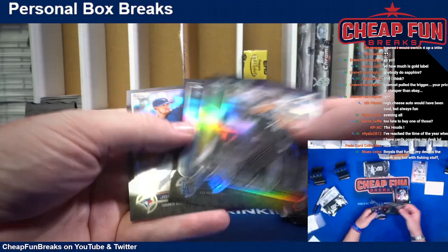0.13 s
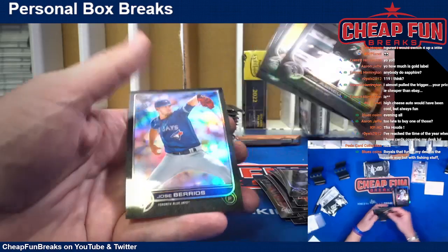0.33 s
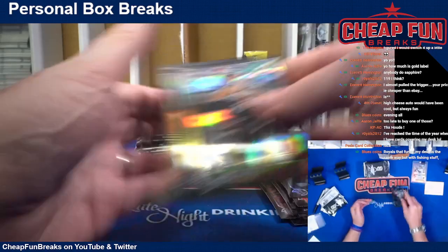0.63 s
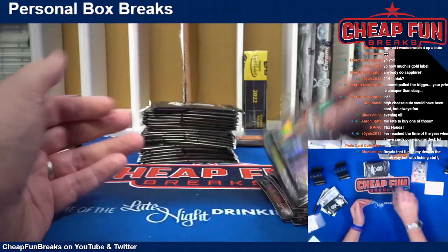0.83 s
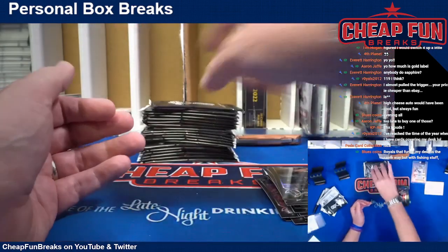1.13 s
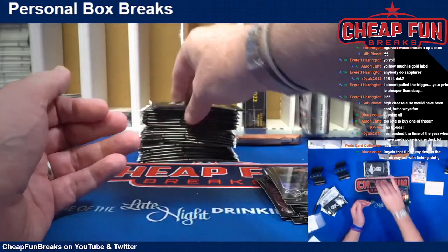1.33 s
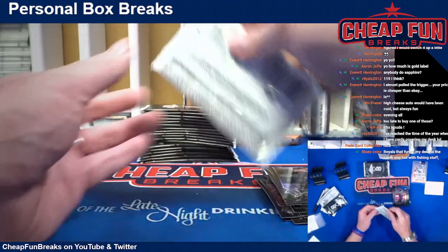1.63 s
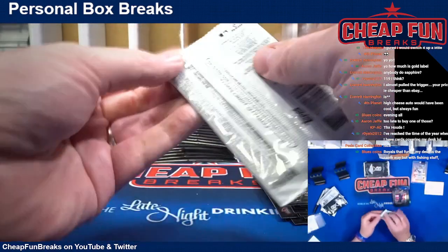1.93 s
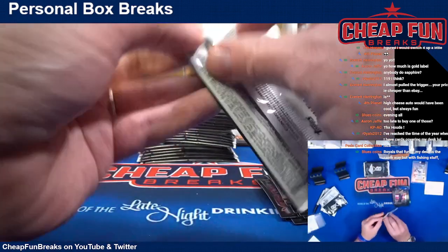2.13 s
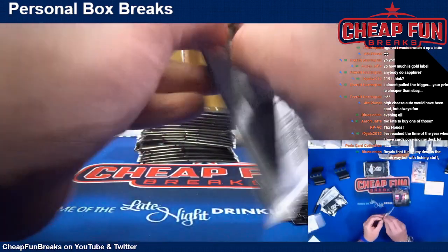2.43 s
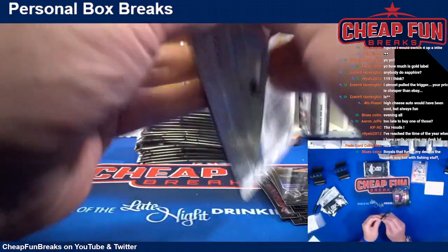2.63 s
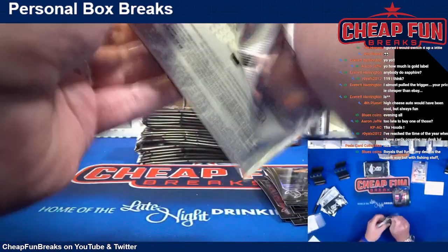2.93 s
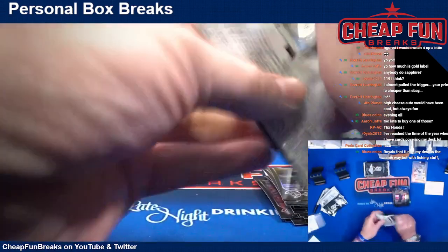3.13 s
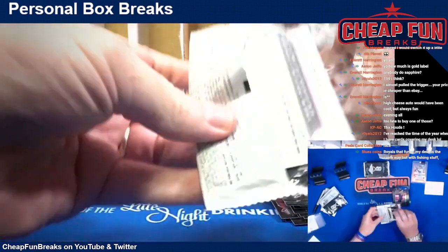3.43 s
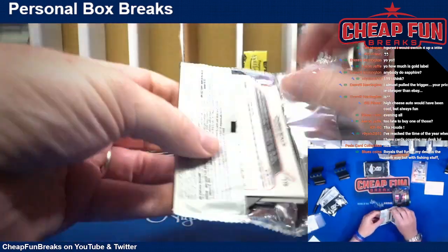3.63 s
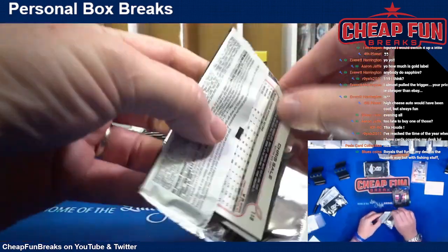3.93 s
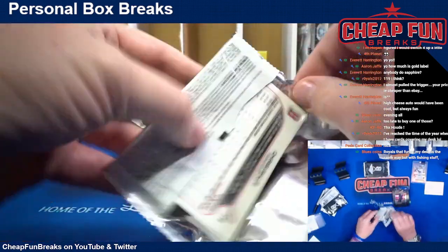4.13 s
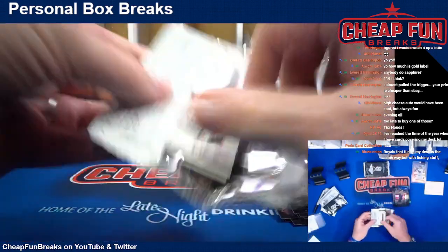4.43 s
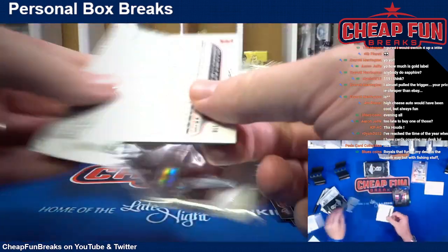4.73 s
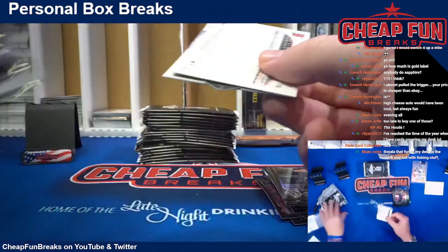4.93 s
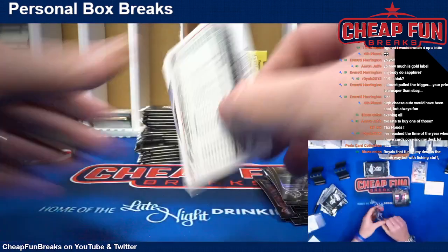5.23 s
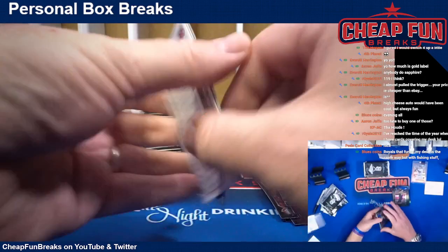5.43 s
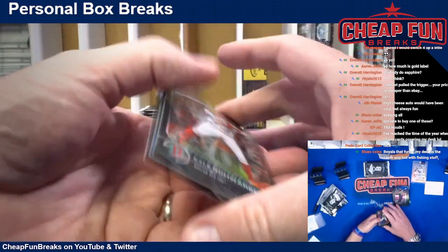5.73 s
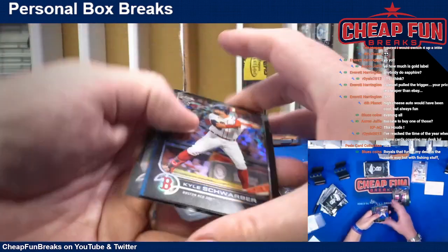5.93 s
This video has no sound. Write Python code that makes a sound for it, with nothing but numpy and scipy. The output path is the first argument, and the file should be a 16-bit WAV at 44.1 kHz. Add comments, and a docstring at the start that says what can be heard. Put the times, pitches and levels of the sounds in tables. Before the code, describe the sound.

Hands tear open a foil card pack with sharp snaps and crinkles, between faint card swishes over a low hum.

```python
"""In a quiet room, near a desk microphone, hands tear open a foil pack of cards and slide the cards out.
Sliding friction makes the cards swish. Creases in the foil buckle, singly as snaps and in crowds as
crinkling, and excite the resonances of the hollow pack. Arms bump the desk, which thuds in its damped
modes and sways the microphone. Rumble, hiss and the hum of appliances lie under it all."""
import sys
import numpy as np
from scipy import signal
from scipy.fft import rfft, irfft
from scipy.io import wavfile
from scipy.ndimage import uniform_filter1d

SR = 44100
rng = np.random.default_rng(int(sys.argv[2]) if len(sys.argv) > 2 else 0)


def int16_out(signal):
    """Quantize to a 16-bit WAV file."""
    q = np.round(np.clip(np.atleast_2d(signal).T, -1, 1) * 32767)
    wavfile.write(sys.argv[1], SR, q.astype(np.int16))


N = 268701


def gain_of(db):
    """Amplitude ratio of a level in decibels."""
    return 10 ** (np.asarray(db) / 20)


def unit_rms(x):
    """Normalisation to an rms of 1."""
    return x / np.sqrt(np.mean(x ** 2) + 1e-20)


def coloured(x, points):
    """Spectral shaping: gains in dB are interpolated on a log-frequency axis."""
    point_hz, db = np.transpose(points)
    hz = np.fft.rfftfreq(len(x), 1 / SR)
    return irfft(rfft(x) * gain_of(np.interp(np.log(hz + 1), np.log(point_hz + 1), db)), len(x))


def add(mix, start_s, sound):
    """Superposition: a sound joins the mix at its start time."""
    part = mix[round(start_s * SR):][:len(sound)]
    part += sound[:len(part)]


def resonate(x, hz, width_hz, stages=1):
    """Forced response of a damped resonator, or of several alike in cascade."""
    carrier = np.exp(2j * np.pi * hz * np.arange(len(x)) / SR)
    pole = np.exp(-np.pi * width_hz / SR)
    for _ in range(stages):
        x = 2 * (carrier * signal.lfilter([1 - pole], [1, -pole], x / carrier)).real
    return x


def room_tone():
    """Background noise: rumble and hiss, with appliance tones that waver by beating with noise bands."""
    # spectrum of the rumble and hiss: (frequency [Hz], relative spectral level [dB])
    air_spectrum = [(10, -8), (25, -11.5), (45, 2), (70, -4), (100, -7.5), (170, -14.5), (300, -22),
                    (600, -27), (1600, -32.5), (2800, -38), (8000, -40), (15000, -41)]
    # appliance tones: (frequency [Hz], base width that the noise band scales up [Hz], level [dB])
    hum_tones = [(118.9, 6.2, -66.5), (249.1, 10, -77.5), (330.9, 7.8, -81.5), (349, 16, -86.5),
                 (491, 15, -87.5), (1603, 180, -96.5)]
    t = np.arange(N) / SR
    out = gain_of(-65.5) * unit_rms(coloured(rng.standard_normal(N), air_spectrum))
    for hz, base_width, db in hum_tones:
        waver = unit_rms(resonate(rng.standard_normal(N), hz, 4.3 * base_width, stages=2))
        tone = np.sin(2 * np.pi * (hz * t + rng.random()))
        out += gain_of(db) * (1.3 * tone + .4 * waver)
    return out


def microphone_sway(rocking_hz=15.6):
    """Infrasonic oscillation: the microphone rocks unsteadily on its stand."""
    # strength of the rocking: (time [s], level [dB])
    rocking_levels = [(0.0, -65.5), (0.27, -48), (0.36, -56), (0.61, -47), (0.85, -55.5), (2.14, -56.5),
                      (2.75, -46), (2.9, -63), (3.09, -46), (3.54, -54.5), (4.14, -49.5), (4.27, -36),
                      (4.41, -46.5), (5.17, -66), (5.36, -46.5), (5.75, -61.5), (6.02, -48.5), (6.09, -51)]
    t = np.arange(N) / SR
    envelope = gain_of(np.interp(t, *np.transpose(rocking_levels)))
    wobble = unit_rms(resonate(rng.standard_normal(N), 1.1 * rocking_hz, width_hz=2.43))
    return envelope * (1.4 * np.sin(2 * np.pi * rocking_hz * t) + 0.2 * wobble)


def card_slides():
    """Friction noise: glossy cards rub on cards and skin with a soft, slightly grainy swish."""
    # sliding strokes: (time [s], duration [s], level [dB], centre frequency [Hz])
    strokes = [(0.194, 0.14, -77, 5070), (0.459, 0.09, -79.5, 3500), (0.605, 0.034, -81, 6900),
               (0.655, 0.044, -68.5, 4320), (1.077, 0.092, -81, 7500), (1.202, 0.06, -68.5, 5000),
               (1.494, 0.034, -74, 4970), (1.645, 0.082, -76.5, 6070), (4.403, .12, -69.5, 6040),
               (5.129, 0.13, -78.5, 4280), (5.443, 0.057, -73, 4040), (5.68, 0.055, -83, 4000)]
    out = np.zeros(N)
    for start, duration, db, hz in strokes:
        rub, grain = rng.standard_normal((2, round(duration * SR)))
        roughness = gain_of(3 * unit_rms(uniform_filter1d(grain, 150)))
        swish = unit_rms(resonate(rub * roughness, hz, 2.8 * hz, stages=2))
        add(out, start, gain_of(db) * swish * signal.windows.tukey(len(swish), .7))
    return out


def pack_body(x):
    """Modal resonance: the hollow pack rings in its broad low modes."""
    # modes of the pack: (frequency [Hz], bandwidth of each stage [Hz], gain [dB])
    modes = [(408, 435, -4), (687, 340, 2), (1166, 150, 8.5), (1697, 1390, -3)]
    return sum(gain_of(db) * resonate(x, hz, width, stages=2) for hz, width, db in modes)


def foil_snaps(typical_t60_s=0.017, t60_spread=0.15):
    """Buckling: a crease gives way in a burst that rings at the crease pitch and knocks in the pack."""
    # snaps of foil and card edges: (time [s], peak level [dB], pitch [Hz], body level [dB re peak])
    snaps = [(0.228, -54, 3970, -1), (0.6213, -57, 7100, -25), (0.6618, -63, 3050, 3),
             (0.6766, -59, 4040, 6), (1.2023, -56, 3000, -11), (1.2252, -53, 4570, -20),
             (1.238, -57, 4000, -20), (1.514, -50, 6900, -24), (1.6445, -43, 7200, -19),
             (1.7345, -37, 6660, -37), (1.802, -46, 7400, -38), (1.8727, -53, 2820, -9),
             (1.986, -49.5, 4550, -13), (2.009, -44, 3520, -32), (2.055, -41, 6000, -42),
             (2.1093, -47, 4060, -5.5), (2.16, -30, 6500, -42), (2.1832, -33, 5050, -36),
             (2.1967, -31.5, 4670, -40), (2.228, -27, 4350, -44), (2.2635, -39, 3550, -48),
             (2.343, -41, 6150, -16), (2.3537, -39, 4260, -19), (2.3979, -47, 5530, -9),
             (2.4304, -45.5, 6500, -22), (2.516, -45.5, 4760, -25), (2.544, -21, 10000, -45),
             (2.5673, -34, 4520, -22), (2.591, -27.5, 6300, -32), (2.626, -38.5, 3740, -33),
             (2.639, -32, 3030, -44), (2.6646, -34.5, 6700, -13), (2.6862, -36.5, 6700, -12),
             (2.7421, -43, 4040, -4), (2.7609, -48.5, 4270, 6), (2.7813, -41.5, 5060, -1),
             (2.811, -45, 6700, -28), (2.8542, -34.5, 7780, -46), (2.8805, -25, 6700, -34),
             (2.9058, -29.5, 6840, -15.5), (2.9258, -33.5, 4250, -20), (2.9687, -40.5, 5960, -18),
             (2.985, -27, 5930, -19), (3.0383, -17, 6500, -38), (3.0675, -28, 7000, -10),
             (3.099, -19.5, 10900, -21), (3.118, -26, 8000, -28), (3.128, -26, 10900, -37),
             (3.1688, -43, 5000, -37), (3.2383, -35, 8200, -16.5), (3.274, -37, 6900, -23),
             (3.325, -40, 5140, -13), (3.35, -44.5, 6100, -20), (3.39, -27.5, 11100, -54),
             (3.4198, -36, 10800, -37), (3.5143, -46.5, 4400, -9.5), (3.7797, -42, 5700, -44),
             (3.7926, -43, 5770, -33), (3.803, -37, 7350, -20.5), (3.8545, -38, 4360, -9.5),
             (3.8791, -23, 7260, -55), (3.898, -26.5, 11900, -7), (3.9334, -40.5, 9750, -34),
             (3.961, -46.5, 5890, -25), (4.0121, -40, 6600, -7), (4.064, -49.5, 3320, -6),
             (4.219, -48, 4630, -12), (4.3047, -39.5, 7840, -28), (4.3485, -44, 3600, -13),
             (4.3794, -55, 3400, 3), (4.52, -47.5, 4400, -4), (4.591, -56.5, 2370, -2),
             (4.63, -37, 5370, -16), (4.667, -46, 2280, -4), (4.732, -39, 3540, -9),
             (4.809, -52, 2250, -28), (4.885, -45, 2730, -0.5), (4.93, -43, 1560, 1)]
    out, t = np.zeros(N), np.arange(1800) / SR
    for start, peak_db, hz, body_db in snaps:
        t60 = np.clip(typical_t60_s * np.exp(t60_spread * rng.standard_normal()), .004, .05)
        crack = 2.5 * gain_of(-60 * t / .0025)
        burst = rng.standard_normal(len(t)) * (crack + gain_of(-60 * t / t60))
        ring = resonate(burst, hz, 0.82 * hz, stages=2)
        bright = ring + .00002 * hz * np.diff(burst, prepend=0)  # small creases have the sharpest edge
        knock = pack_body(burst)
        snap = bright / abs(bright).max() + gain_of(body_db) * knock / abs(knock).max()
        add(out, start, gain_of(peak_db) * snap)
    return out


def desk_thuds():
    """Damped free vibration: each soft bump starts the desk modes, with a dull knock on top."""
    # arms bumping the desk: (time [s], then the level of each of the four modes [dB])
    bumps = [(.5, -67, -49, -50, -59.5), (.679, -31.5, -28.5, -34.5, -44), (0.701, -45, -38, -44, -53),
             (1.901, -60, -99, -49.5, -81), (2.572, -94, -88, -59.5, -80), (4.104, -44.5, -73, -41.5, -77)]
    # modes of the desk: (frequency [Hz], 60 dB decay time [s], rise time constant [s])
    modes = [(40.8, 0.63, 0.016), (70.8, 0.17, 0.0046), (107.1, 0.36, 0.0031), (164, 0.25, 0.0084)]
    out, t = np.zeros(N), np.arange(SR) / SR
    for start, *levels_db in bumps:
        for db, (hz, t60, rise) in zip(levels_db, modes):
            envelope = gain_of(db - 60 * t / t60) * (1 - np.exp(-t / rise))
            add(out, start, envelope * np.sin(2 * np.pi * hz * t))
        knock = resonate(rng.standard_normal(SR), hz=220, width_hz=300, stages=2)
        envelope = gain_of(-60 * t / 0.13) * (1 - np.exp(-t / 0.0019))
        add(out, start, gain_of(levels_db[-1] + 7) * envelope * knock)
    return out


def pull_levels(t, swell_db=9, ease_db=9, floor_db=-100, grip_db_per_s=3000, release_db_per_s=440):
    """Level envelopes of the crinkle: each pull grips, swells, eases and lets go; the strongest rules."""
    # pulls and squeezes on the foil: (time [s], swell [s], ease [s], peak mid-band level [dB],
    # body level [dB re mid band], treble level [dB re mid band])
    pulls = [(1.733, .005, 0.05, -65.5, -18, -16), (1.8, .005, 0.086, -70, -18, -19),
             (1.999, 0.097, 0.11, -69.5, -10, -13), (2.16, 0.049, 0.041, -47.5, -16, -5),
             (2.342, 0.0067, 0.076, -58, -10.5, -5), (2.546, 0.1, 0.037, -45.5, -12, -8),
             (2.689, 0.085, 0.06, -57, -5, -10.5), (2.851, 0.056, 0.033, -48.5, -9, -15),
             (2.981, 0.015, 0.055, -43.5, -12, -14), (3.023, 0.014, 0.025, -39.5, -9.5, -5.5),
             (3.064, 0.017, .04, -41.5, -1.5, -4), (3.234, 0.017, 0.043, -57.5, -8, -14),
             (3.31, 0.016, 0.039, -64, -4.5, -3.5), (3.388, 0.0074, 0.052, -61.5, -10, -17),
             (3.489, 0.03, 0.011, -65, -9, -8), (3.614, 0.017, .04, -67.5, -7.5, -10),
             (3.73, 0.011, 0.023, -69.5, -8, -6), (3.844, 0.031, 0.041, -55.5, -5, -8),
             (3.991, 0.022, 0.044, -62, -4, -5), (4.159, 0.014, 0.018, -65, -8, -8),
             (4.2, 0.027, 0.029, -65, -3, -14), (4.281, 0.019, 0.0087, -61.5, -15, -13),
             (4.344, 0.0037, 0.042, -58.5, -13, -8.5), (4.49, .03, .012, -60.5, -5, -10.5),
             (4.721, 0.019, 0.008, -63.5, -3, -9), (4.805, 0.0046, 0.0089, -60.5, -10, -6),
             (4.877, 0.0082, 0.013, -66, 3, -26), (4.929, 0.0041, 0.0096, -61.5, -9, -18)]
    start, swell, ease, peak_db, body_db, treble_db = np.transpose(pulls)[:, :, None]
    past_peak = t - start - swell
    pull_db = peak_db - grip_db_per_s * np.maximum(start - t, 0)
    pull_db -= swell_db * np.clip(-past_peak / swell, 0, 1)
    pull_db -= ease_db * np.clip(past_peak / ease, 0, 1)
    pull_db -= release_db_per_s * np.maximum(past_peak - ease, 0)
    strongest = pull_db.argmax(axis=0)
    balance_db = [uniform_filter1d(db[strongest, 0], size=400) for db in (body_db, treble_db)]
    return np.maximum(pull_db.max(axis=0), floor_db), *balance_db


def foil_crinkle(tick_t60_s=.008):
    """Shot noise of many small creases: hard pulls pack them into a rip, light ones leave ticks."""
    # resonances of the small creases: (frequency [Hz])
    crease_hz = [2580, 3500, 5070, 6700, 7900, 9700, 13700]
    # colour of the crinkling foil: (frequency [Hz], gain [dB])
    foil_colour = [(1200, -37), (2000, -6.5), (3600, -4), (6500, -2), (12000, 15.5), (15500, 3)]
    t = np.arange(N) / SR
    level_db, body_db, treble_db = pull_levels(t)
    ticks_per_s = np.interp(level_db, [-75, -42], [240, 1100])
    flicker = gain_of(2.3 * np.clip(unit_rms(uniform_filter1d(rng.standard_normal(N), 400)), -2, 1.5))
    sizes = gain_of(3 * np.minimum(rng.exponential(1, N), 3.5))
    impulses = sizes * (rng.random(N) < ticks_per_s / SR)
    crease = rng.integers(0, len(crease_hz), N)
    decay = gain_of(-60 * t[:900] / tick_t60_s)
    ticks = [signal.oaconvolve(impulses * (crease == k), decay)[:N] * rng.standard_normal(N)
             for k in range(len(crease_hz))]
    pitched = sum(unit_rms(resonate(tick, hz, 2.1 * hz)) for tick, hz in zip(ticks, crease_hz))
    tick_gain = flicker / np.sqrt(ticks_per_s / ticks_per_s.mean())  # more creases share the same effort
    crackle = tick_gain * (unit_rms(pitched) + .4 * unit_rms(sum(ticks)))
    hiss = .38 * flicker * rng.standard_normal(N)
    crinkle = coloured(crackle + hiss, foil_colour)
    mid = coloured(crinkle, [(6500, 0), (8000, -6), (11000, -30)])
    treble = gain_of(treble_db) * unit_rms(crinkle - mid)
    knocks = tick_gain * unit_rms(sum(ticks[:3]))  # the larger creases knock the pack
    body = gain_of(body_db) * unit_rms(pack_body(knocks + 1.96 * rng.standard_normal(N)))
    return gain_of(level_db) * (unit_rms(mid) + treble + body)


def reverberate(x, t60_s=0.33, reflections_per_s=3000):
    """Convolution with the room's response: direct sound, one early bounce and a faint, sparse tail."""
    t = np.arange(SR // 3) / SR
    reflections = rng.choice([-1., 1.], len(t)) * (rng.random(len(t)) < reflections_per_s / SR)
    tail = reflections * gain_of(-60 * t / t60_s) * (t > .003)
    response = gain_of(-17) * tail / np.linalg.norm(tail)
    response[0] = 1
    response[round(.0013 * SR)] += .4  # bounce off the desk top
    return signal.oaconvolve(x, response)[:N]


def scene():
    """Superposition in mono: reverberant foil and cards, desk thuds, microphone sway and room tone."""
    handling = reverberate(foil_snaps() + foil_crinkle() + card_slides())
    return (handling + desk_thuds() + microphone_sway() + room_tone())[None]


def record(dry, cutoff_hz=16000):
    """Band limiting: a linear-phase low-pass filter removes the highest treble."""
    low_pass = signal.firwin(511, cutoff_hz, window=("kaiser", 9), fs=SR)
    return signal.oaconvolve(dry, low_pass[None], "same")


dry = scene()
out = record(dry)
int16_out(out)
```